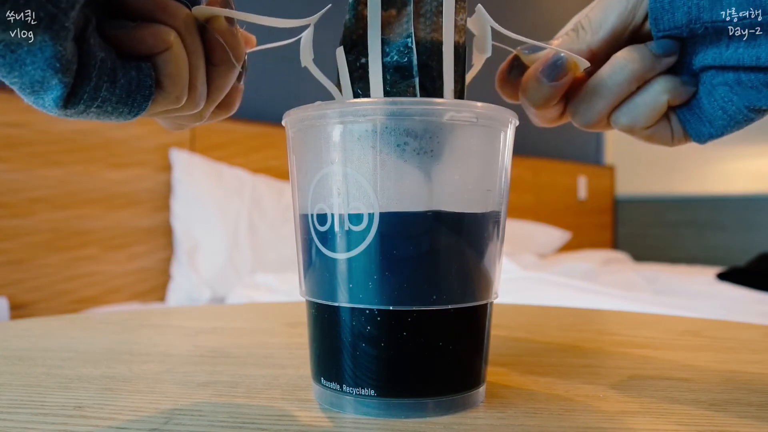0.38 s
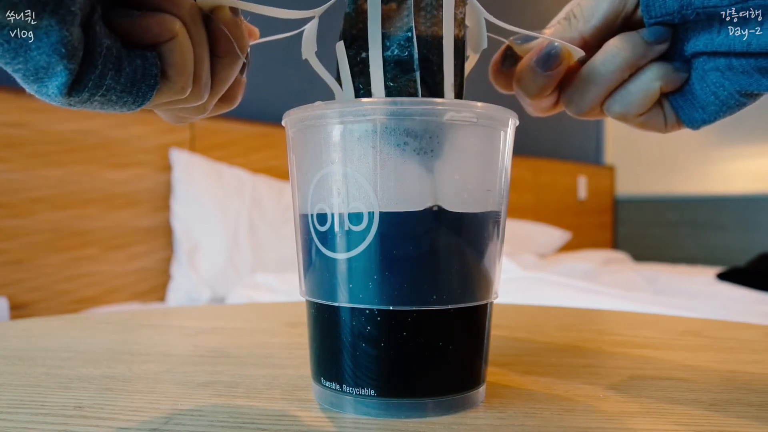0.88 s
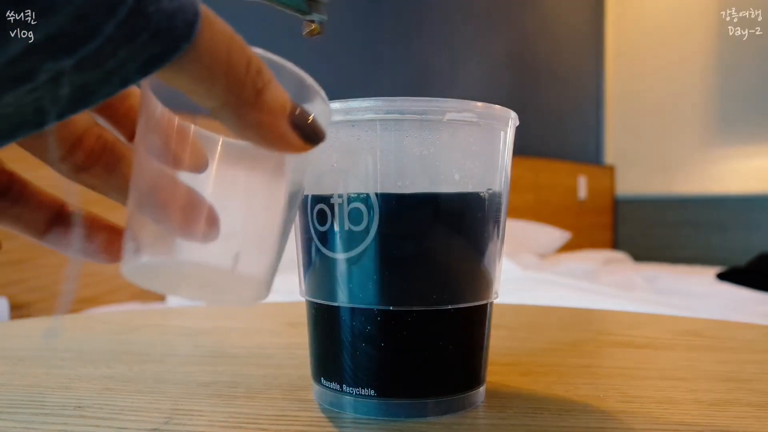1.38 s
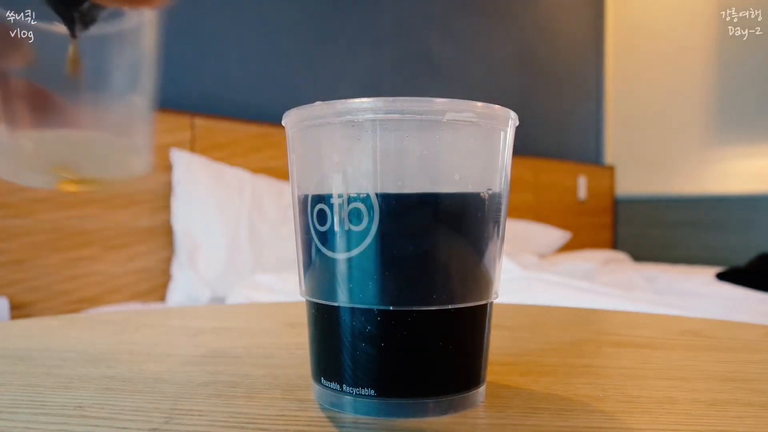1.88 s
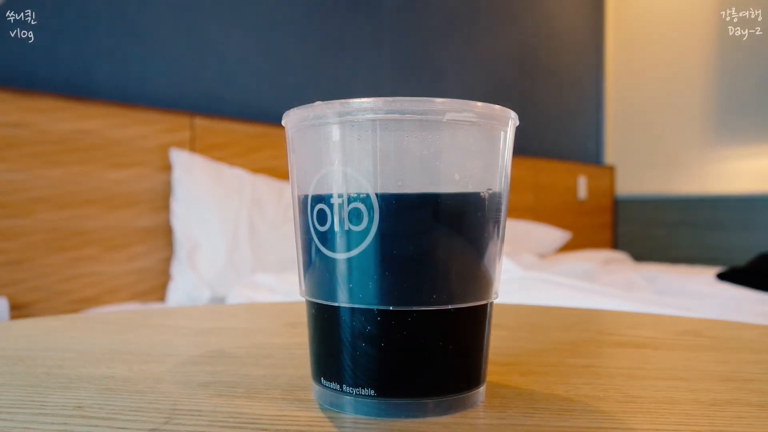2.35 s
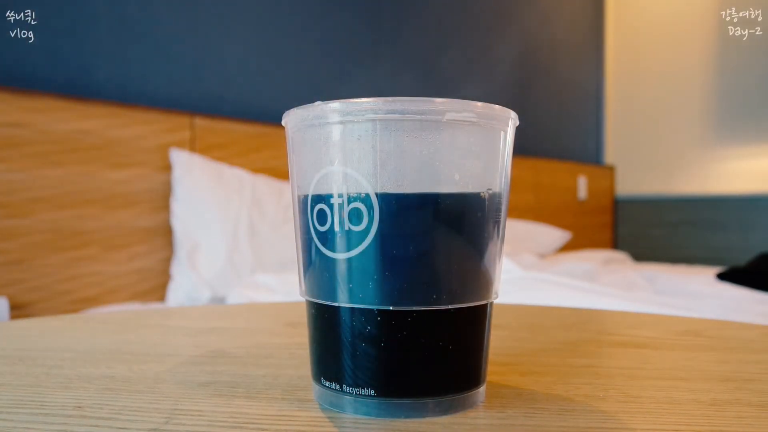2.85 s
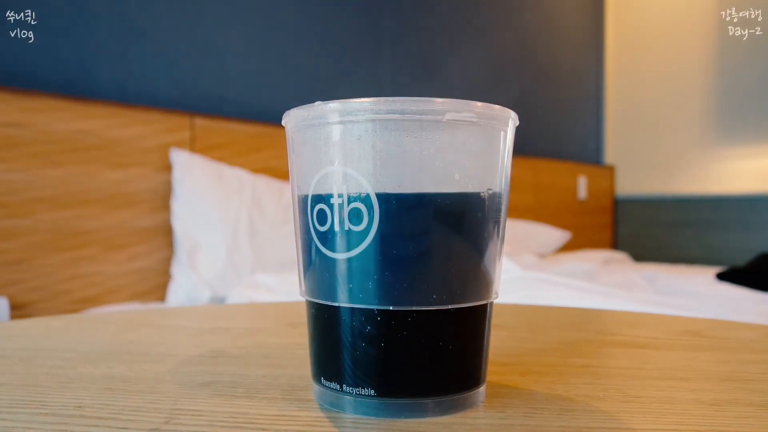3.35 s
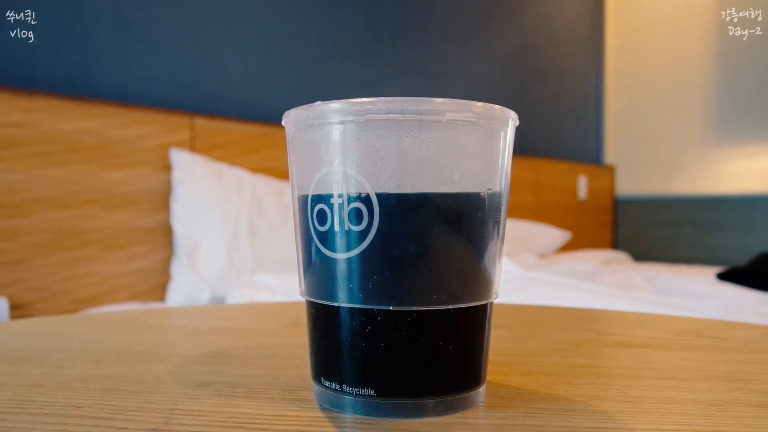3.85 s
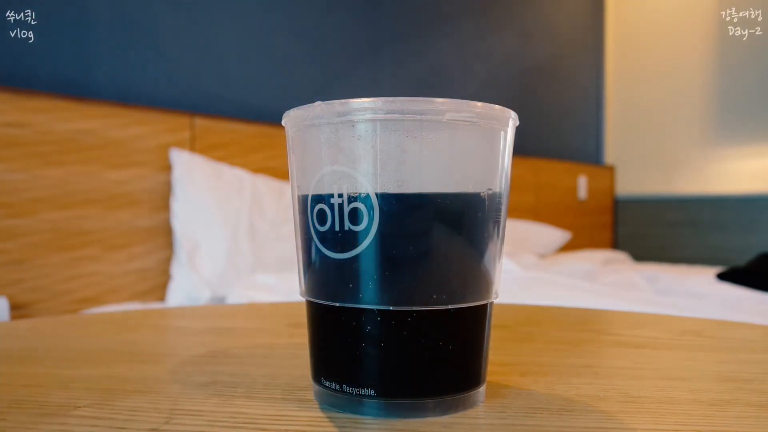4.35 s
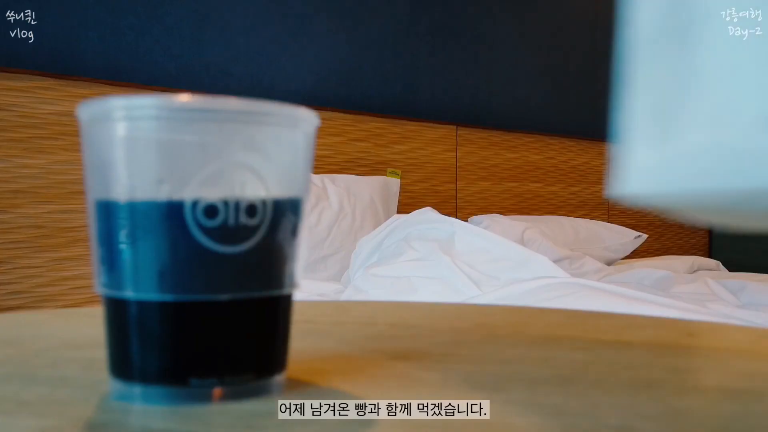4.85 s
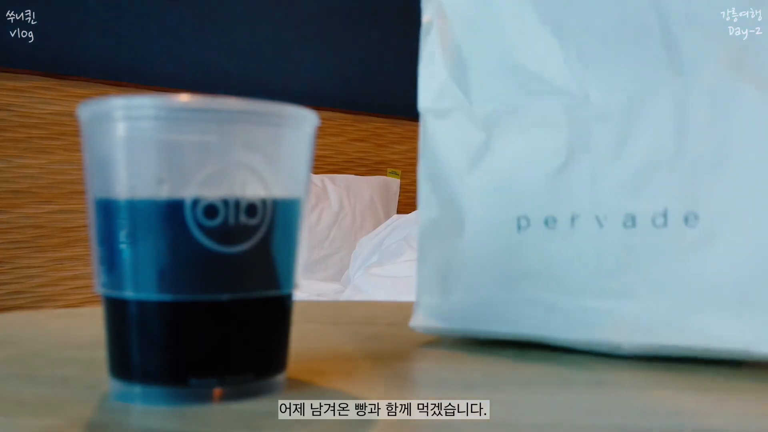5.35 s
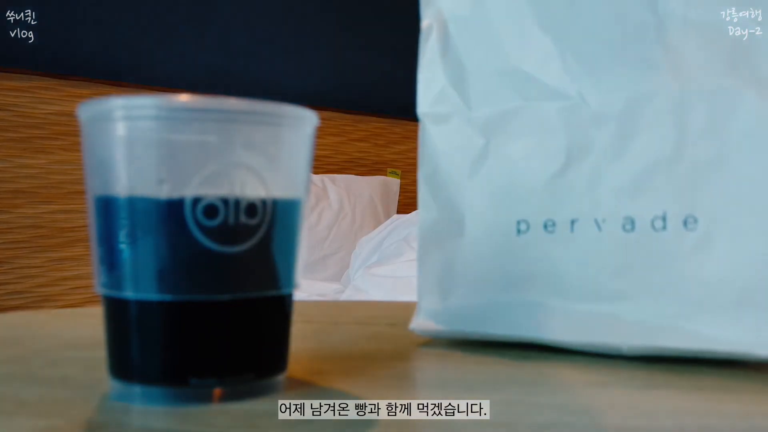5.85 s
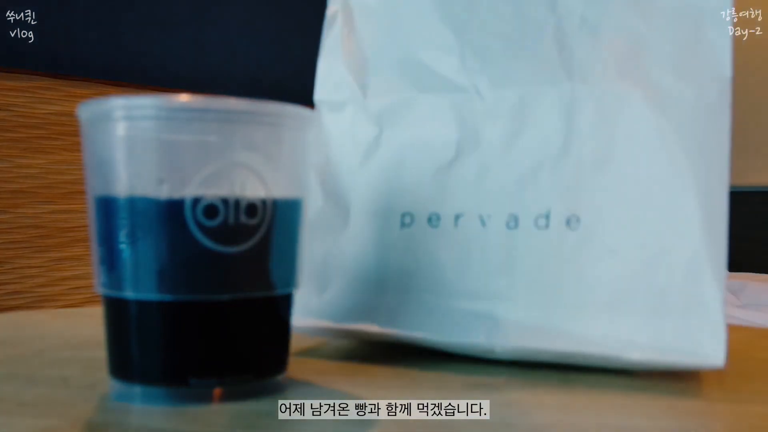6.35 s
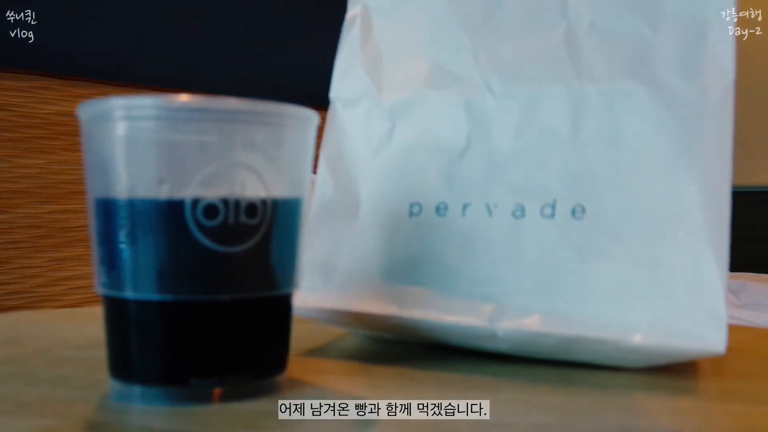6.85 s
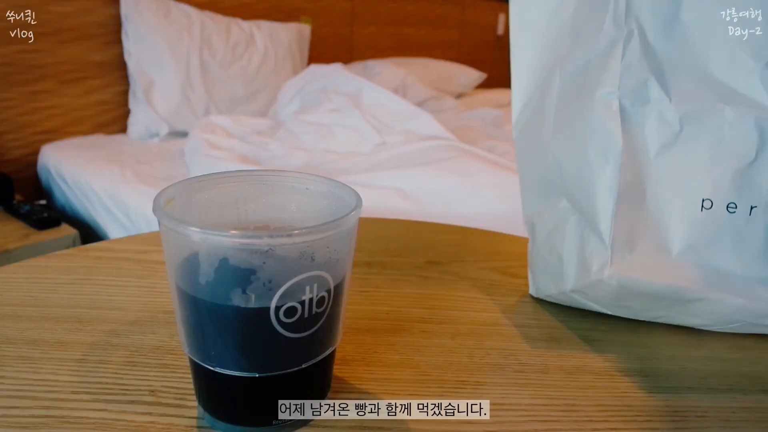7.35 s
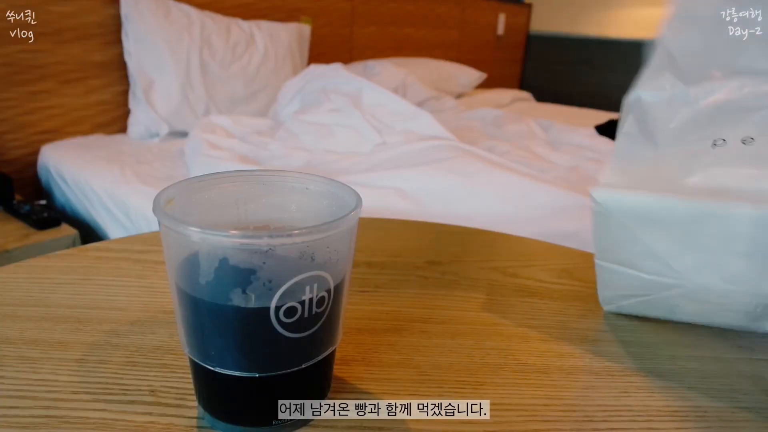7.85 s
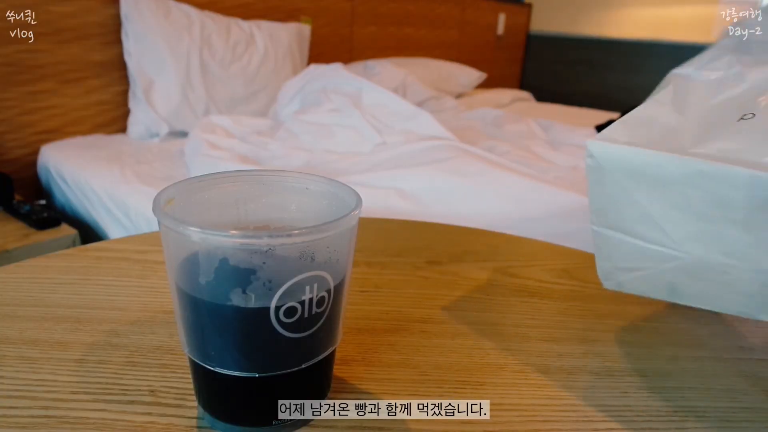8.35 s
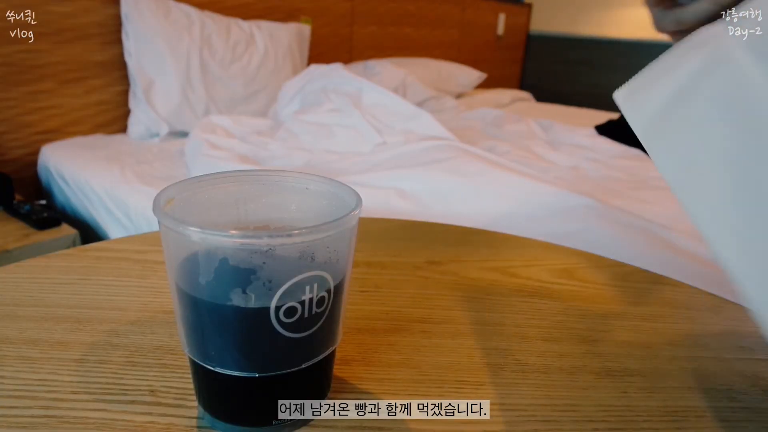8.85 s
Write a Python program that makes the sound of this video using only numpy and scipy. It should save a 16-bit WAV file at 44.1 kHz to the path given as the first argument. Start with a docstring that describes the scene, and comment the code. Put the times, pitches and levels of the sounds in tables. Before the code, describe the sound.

Close to a wooden table in a quiet bedroom, low airy hum and soft rumble. A tiny drip, sleeves brushing, a light cup knock and faint high ring come first. Around five seconds a paper bag touches down with a few dry crinkles, is shifted, then from seven seconds hands work it into loud, dense crackling with sharp snaps.

```python
"""A quiet bedroom heard close to a wooden table, over humming air and a lumpy rumble, with three brief fades.
A faint whine (a flickering sine) and a last drop (one ringing click) open it; sleeves brush as shaped noise.
A small cup knocks the table's ringing modes, and something hard gives one thin high ring.
Then a paper bag is set down, shifted and pulled open: creases snap as noise bursts and the walls buckle in
short notes. Clumped grains crackle densely as the hands work it, and two stiff creases pop very close."""
import sys
import numpy as np
from scipy import signal
from scipy.fft import rfft, irfft
from scipy.io import wavfile

SR = 44100
rng = np.random.default_rng(int(sys.argv[2]) if len(sys.argv) > 2 else 0)


def level_to_linear(level):
    """Convert decibel levels to linear amplitude factors, elementwise."""
    exponent = np.asarray(level, float) / 20
    return 10 ** exponent


def transcribe(u):
    """Save the signal u as a 16-bit wav file named by the first command-line argument.

    u: samples, shape (n,) or (channels, n), limited to [-1, 1]; the rate is SR.
    q: integer samples, one column per channel.
    """
    v = np.clip(np.atleast_2d(u).T, -1, 1)
    q = np.round(v * 32767).astype(np.int16)
    wavfile.write(sys.argv[1], SR, q)


N = 395136

# Colour of the ventilation noise. Each row: frequency in Hz, relative density in dB per Hz.
AIR_COLOUR = [(41, -36), (70, -12), (168, -10), (197, -4.5), (308, -5.5), (472, -15), (647, -12),
              (1420, -15), (1940, -21), (3480, -24.5), (15000, -40.5)]
# Loudness of the ventilation noise, before its small drift. Each row: time in seconds, level in dB.
AIR_LEVEL = [(0, -64), (1.1, -63), (1.3, -61), (3, -57.5), (4.7, -60.5), (8.96, -58)]
# Loudness of the low rumble. Each row: time in seconds, level in dB.
RUMBLE_LEVEL = [(0.0, -63), (2.37, -68.5), (2.84, -56), (3.34, -66.5), (3.69, -57), (4.49, -60.5),
                (5.5, -60), (5.94, -58), (6.09, -47.5), (6.44, -50.5), (6.89, -66), (7.14, -51),
                (8.14, -57), (8.21, -61), (8.83, -56), (8.96, -40)]
# Swell tables: rise and fall are the times taken by 20 dB.
# The hum swells. Each row: peak in seconds, level in dB, rise in seconds, fall in seconds.
HUM_SWELLS = [(1.36, -57.5, 0.17, 0.49), (2.72, -51.5, 0.67, 0.61), (4.35, -57.5, 0.32, 0.59),
              (5.12, -54, 0.2, 0.15), (6.6, -51.5, 0.94, 0.48), (8.8, -42, 0.16, 0.52)]
# The hum's octave swells once. Each row: peak in seconds, level in dB, rise in seconds, fall in seconds.
OCTAVE_SWELLS = [(1.46, -57, 0.36, 0.52)]
# The table sways under the bag. Each row: peak in seconds, level in dB, rise in seconds, fall in seconds.
SWAY_SWELLS = [(5.58, -50, 0.12, 0.35)]
# Strokes of sleeves and hands. Each row: peak in seconds, level in dB before the brushing trim,
# rise in seconds, fall in seconds, treble in dB relative to that level.
STROKES = [(.33, -58.5, 0.092, 0.16, -10), (1.546, -49, 0.0081, 0.13, 1), (1.595, -52.5, 0.27, 0.21, -17),
           (2.06, -71, 0.084, 0.12, 12), (2.39, -57.5, 0.16, 0.36, -5), (2.63, -47.5, 0.091, 0.16, -2),
           (2.789, -40, 0.076, 0.22, 3), (2.808, -30, 0.0089, 0.097, 0), (3.1, -50.5, 0.49, 0.17, -3),
           (3.275, -47, 0.06, 0.13, -3.5), (3.705, -54, 0.012, 0.22, 1), (3.83, -45.5, 0.21, 0.25, -3),
           (4.1, -51, 0.27, 0.39, -8), (4.381, -40.5, 0.015, 0.14, -7), (4.46, -48, 0.19, 0.093, -3),
           (4.59, -45.5, 0.033, 0.22, -7), (4.776, -38.5, 0.021, 0.085, -10)]
# Blows on the table. Each row: time in seconds, strength in dB, hardness in dB per octave.
KNOCKS = [(1.543, -35, 2.5), (1.5468, -32.5, -1), (1.594, -35.5, 2.5), (3.2, -39, 10), (3.701, -33.5, 6),
          (4.372, -28.5, 17), (4.769, -22.5, 21), (4.779, -26, 23)]
# Modes of the table top. Each row: frequency in Hz, relative level in dB, time to die by 60 dB in seconds.
TABLE_MODES = [(223, -7, 0.18), (317, -5.5, 0.17), (810, 4, 0.0089), (1380, 0, 0.0077), (1475, -3.5, 0.016),
               (2140, -9, 0.0032)]
# A wall of the bag buckles with a hollow note. Each row: start in seconds, peak in dB, pitch in Hz.
FOLDS = [(5.407, -30.5, 835), (5.428, -33, 920), (5.468, -32.5, 520), (6.3145, -25, 855),
         (6.328, -26.5, 516), (6.355, -30, 493), (6.364, -30, 790), (7.067, -24.5, 543),
         (7.092, -23.5, 388), (7.313, -25.5, 385), (7.446, -27, 449), (7.47, -22.5, 553),
         (7.58, -19.5, 553), (7.61, -19.5, 780), (7.731, -22, 580), (7.87, -27.5, 570)]
# The hands squeeze or pull the paper. Each row: peak in seconds, level in dB before the crackle trim,
# rise in seconds, fall in seconds, treble in dB relative to that level.
PULLS = [(4.71, -55, 0.075, 0.4, -8), (5.2, -53.5, 0.14, 0.078, -32), (5.41, -33, 0.043, 0.12, -7),
         (5.55, -52, 0.32, 0.67, -5), (6.001, -44, 0.28, 0.99, -2), (6.343, -34.5, 0.037, 0.066, 5.5),
         (6.58, -50.5, 0.32, 0.33, -5), (6.9, -41, 0.025, 0.035, -19), (7.012, -24.5, 0.028, 1, 4),
         (7.084, -11.5, 0.024, 0.041, 6), (7.22, -35, 0.14, 0.34, 7.5), (7.36, -21, 0.22, 0.16, -1.5),
         (7.47, -22, 0.084, 0.19, 1.5), (7.599, -21, 0.13, 0.4, 1), (7.73, -23, 0.15, 0.051, 3.5),
         (7.9, -25, 0.16, 0.46, 1.5), (7.98, -30, 0.48, 0.21, -15), (8.067, -22, 0.022, 0.062, -9),
         (8.12, -40, 0.13, 0.064, 9), (8.299, -36.5, 0.047, 0.79, 8.5), (8.439, -24, 0.19, 0.021, 0),
         (8.491, -30, 0.12, 0.1, 10.5), (8.559, -25.5, 0.0089, 0.0085, 12), (8.613, -24, 0.053, 0.031, 9),
         (8.669, -36, 0.078, 0.51, 14), (8.74, -22.5, 0.1, 0.1, -20), (8.791, -22.5, 0.27, 0.041, -4),
         (8.923, -25.5, 0.011, 0.075, -18)]
# Creases snapping. Each row: start in seconds, level in dB before the crease and body gains,
# pitch of the crease in Hz, bag body in dB relative to that level.
SNAPS = [(5.0876, -24.5, 3520, -19.5), (5.097, -24, 2680, -15.5), (5.3645, -52, 3000, -8),
         (5.3804, -34.5, 5230, -8), (5.398, -22, 2510, -18.5), (5.4352, -35, 2640, -5.5),
         (5.4623, -27, 3370, -10.5), (5.5129, -23.5, 5900, -15), (5.526, -26, 3330, -18.5),
         (5.7763, -23, 3160, -14), (5.939, -34, 6250, -26), (5.9763, -17, 2650, -17.5),
         (6.0086, -27.5, 3130, -13), (6.0257, -14.5, 7030, -23), (6.0467, -15, 2670, -12.5),
         (6.0504, -12, 2600, -31), (6.314, -27.5, 2900, -6.5), (6.327, -20.5, 4340, -16),
         (6.364, -12.5, 4700, -20.5), (6.377, -29, 2750, -13), (6.63, -28.5, 3400, -12),
         (6.6404, -25, 4700, -20), (6.874, -28.5, 4120, -24.5), (6.906, -31.5, 3020, -5.5),
         (6.926, -13, 4560, -23), (6.975, -19, 3010, -17.5), (7.0273, -6, 4500, -24),
         (7.0759, -4, 5700, -32), (7.0874, -10, 13200, -20), (7.094, -6, 2660, -38),
         (7.1319, -5, 6600, -24.5), (7.178, -20, 3050, -39), (7.1899, -10.5, 7230, -24),
         (7.3162, -13, 3800, -18.5), (7.3402, -6, 6120, -20), (7.3639, -10.5, 2760, -24),
         (7.3767, -14, 3140, -13), (7.4127, -8.5, 5200, -34), (7.439, -4.5, 13100, -29),
         (7.444, -7, 6540, -24), (7.4693, -3, 12300, -27), (7.5194, -9.5, 8330, -17.5),
         (7.5758, -8, 4940, -21), (7.5781, -10, 3020, -16), (7.6059, -15, 3070, -20),
         (7.6138, -4, 10700, -22), (7.622, -6.5, 2700, -25), (7.6899, -22, 6900, -9),
         (7.731, -10.5, 5900, -24), (7.745, -9.5, 12100, -20), (7.8, -23, 5450, -33),
         (7.866, -8, 3200, -22), (7.876, -9.5, 3950, -19.5), (7.884, -5.5, 14000, -28),
         (7.9403, -8.5, 5570, -18), (7.9651, -5.5, 3260, -42), (8.054, -18.5, 2790, -9),
         (8.077, -6.5, 12700, -32), (8.1021, -16, 2900, -37), (8.207, -17.5, 11300, -48),
         (8.2658, -18.5, 2990, -21), (8.338, -16.5, 4700, -24.5), (8.4377, -5.5, 3300, -26.5),
         (8.47, -11, 6300, -41), (8.555, -9, 7400, -37), (8.5625, -7.5, 3990, -45),
         (8.6113, -7.5, 6100, -48), (8.624, -11.5, 13100, -43), (8.6268, -14, 4860, -35),
         (8.7178, -10.5, 4500, -32), (8.7368, -13, 3400, -17), (8.8796, -24.5, 2980, -8),
         (8.9178, -18, 2700, -13.5)]
# Stiff creases popping very close. Each row: time in seconds, strength of the click in dB.
CRACKS = [(8.155, 3), (8.4519, 4.5)]
# Resonances of the hollow bag. Each row: frequency in Hz, width in Hz, gain in dB around which it wanders.
BAG_RESONANCES = [(357, 250, -2.5), (566, 66, -7.5), (796, 410, -2)]
# Centres between which colour is blended, in Hz: the part left out, body, middle, treble.
SHADES_HZ = [45, 700, 3500, 11000]
# Echoes off the table top and nearest wall, before dulling. Each row: delay in seconds, level in dB.
ECHOES = [(.005, -16.5), (.011, -18)]
# Room tail by band. Each row: centre in Hz, time to die by 60 dB in seconds, relative level in dB.
ROOM_BANDS = [(150, 0.41, 11.5), (540, 0.5, -2), (2190, 0.37, 3), (5750, 0.38, -3), (14700, 0.26, 0.5)]
# Brief fades. Each row: sound stops in seconds, fade-out in seconds, sound returns in seconds,
# fade-in in seconds.
FADES = [(1.171, .1, 1.19, .15), (4.607, .1, 4.622, .13), (6.929, .1, 6.945, .13)]


def rms_one(x):
    """Scales x to an rms of one."""
    return x / np.sqrt(np.mean(x ** 2) + 1e-20)


def level_line(rows):
    """Draws straight lines in dB between the timed levels."""
    s, db = np.transpose(rows)
    return np.interp(np.arange(N) / SR, s, db)


def band(x, low_hz, high_hz):
    """Keeps the sound between two frequencies."""
    sos = signal.butter(2, [low_hz, min(high_hz, .45 * SR)], "band", fs=SR, output="sos")
    return signal.sosfilt(sos, x)


def drift(corner_hz):
    """Slow random wander of rms near one: noise through two smoothing poles, drawn every 40 samples."""
    r = np.exp(-80 * np.pi * corner_hz / SR)
    noise = rng.standard_normal(N // 40 + 2002)
    slow = signal.lfilter([1], [1, -2 * r, r * r], noise)[2000:]   # skip the filter's start
    return np.interp(np.arange(N) / 40, np.arange(len(slow)), rms_one(slow))


def resonance(x, hz, width_hz):
    """Two-pole resonance with a peak gain near one."""
    r = np.exp(-np.pi * width_hz / SR)
    poles = [1, -2 * r * np.cos(2 * np.pi * hz / SR), r * r]
    return signal.lfilter([(1 - r * r) / 2, 0, (r * r - 1) / 2], poles, x)


def ring(clicks, hz, t60):
    """A unit click sets a dying sine of starting height one ringing."""
    r, w = level_to_linear(-60 / (t60 * SR)), 2 * np.pi * hz / SR
    return signal.lfilter([0, np.sin(w)], [1, -2 * r * np.cos(w), r * r], clicks + 1e-18)


def click_at(s, db):
    """One single-sample click."""
    return level_to_linear(db) * (np.arange(N) == round(s * SR))


def swells(rows, colour_db=0):
    """Gain of overlapping swells, linear in dB and added by power; colour_db shifts each one's level."""
    t, power = np.arange(N) / SR, np.zeros(N)
    for (peak_s, db, rise_s, fall_s, *_), shift_db in zip(rows, np.broadcast_to(colour_db, len(rows))):
        rising, falling = (peak_s - t) / max(rise_s, .005), (t - peak_s) / max(fall_s, .005)
        away = np.where(t < peak_s, rising, falling)
        near = away < 4   # silent beyond 80 dB down
        power[near] += level_to_linear(2 * (db + shift_db - 20 * away[near]))
    return np.sqrt(power)


def shades(x, centres_hz):
    """Splits x into overlapping bands, peaked at the centres, that add up to x."""
    log_hz = np.log(np.fft.rfftfreq(x.shape[-1], 1 / SR) + 1)
    spectrum = rfft(x)
    weights = [np.interp(log_hz, np.log(centres_hz), one) for one in np.eye(len(centres_hz))]
    return [irfft(spectrum * weight, x.shape[-1]) for weight in weights]


def coloured(x, rows, body_db):
    """Body, middle and treble of x follow the swells, each swell with its own brightness."""
    _, body, middle, treble = [rms_one(part) for part in shades(x, SHADES_HZ)]
    treble_db = np.array(rows)[:, 4]
    return swells(rows, body_db) * body + swells(rows) * middle + swells(rows, treble_db) * treble


def ventilation():
    """Air noise shaped in frequency, its level drifting slightly."""
    hz = np.fft.rfftfreq(N, 1 / SR)
    points_hz, points_db = np.transpose(AIR_COLOUR)
    colour_db = np.interp(np.log(hz + 1), np.log(points_hz), points_db)
    air = rms_one(irfft(rfft(rng.standard_normal(N)) * level_to_linear(colour_db), N))
    return level_to_linear(level_line(AIR_LEVEL) + 1.2 * drift(12.4)) * air


def rumble():
    """Noise through two low resonances, one narrow and one wide, rising and sinking in lumps."""
    rumble_hz = 40
    narrow = resonance(rng.standard_normal(N), rumble_hz, 10)
    return level_to_linear(level_line(RUMBLE_LEVEL)) * rms_one(resonance(narrow, rumble_hz, 45))


def hum():
    """A sine of wavering pitch and its octave, each with its own swells."""
    hum_hz, waver_hz = 208.5, 1.2
    phase = 2 * np.pi * np.cumsum(hum_hz + waver_hz * drift(3)) / SR
    return swells(HUM_SWELLS) * np.sin(phase) + swells(OCTAVE_SWELLS) * np.sin(2 * phase)


def table_sway():
    """The table sways once under the bag: a very low sine swells and sinks."""
    sway_hz = 17
    return swells(SWAY_SWELLS) * np.sin(2 * np.pi * sway_hz * np.arange(N) / SR)


def whine():
    """A faint, thin sine whose level flickers, until it stops."""
    t = np.arange(N) / SR
    whine_hz, level_db, flicker_db, ends_s = 3402, -82.5, 5, 1.17
    return level_to_linear(level_db + flicker_db * drift(9.9)) * (t < ends_s) * np.sin(2 * np.pi * whine_hz * t)


def drip():
    """A last drop falls into the cup: one click rings a very short note."""
    return ring(click_at(.268, -55), 3850, .01)


def brushing():
    """Cloth on cloth: smooth friction noise with a broad resonance, slightly uneven."""
    trim_db, uneven_db, body_db = -9, 0.94, 1
    noise = rng.standard_normal(N)
    cloth = noise + level_to_linear(0.45) * resonance(noise, 2720, 2700)
    return level_to_linear(trim_db + uneven_db * drift(23)) * coloured(cloth, STROKES, body_db)


def knocks():
    """Blows set the table's modes ringing, harder ones favouring the upper modes."""
    out, (s, strength_db, hardness_db) = np.zeros(N), np.transpose(KNOCKS)
    for k, (hz, level_db, t60) in enumerate(TABLE_MODES):
        clicks = np.zeros(N)
        tilt_db = hardness_db * np.log2(hz / 1400)
        uneven_db = rng.normal(0, 0.27, len(s))
        clicks[np.round(s * SR).astype(int)] = level_to_linear(strength_db + level_db + tilt_db + uneven_db)
        out += (-1) ** k * ring(clicks, hz, t60)
    # the contact lasts a moment, which rounds the attack
    return signal.lfilter(np.hanning(14) / 6.5, 1, out)


def ping():
    """One thin high ring of something hard: a click sets a single sine dying away."""
    return ring(click_at(4.105, -66), 8090, .45)


def bag_body(x):
    """The hollow bag changes shape, so the resonances it adds to x come and go."""
    wander_db, wander_hz = 3.5, 14
    out = x
    for hz, width_hz, db in BAG_RESONANCES:
        out = out + level_to_linear(db + wander_db * drift(wander_hz)) * resonance(x, hz, width_hz)
    return out


def folds():
    """Each buckling wall is a short note that swells at once and dies within a few cycles."""
    rise_s, cycles = 0.0007, 16   # cycles taken to die by 60 dB
    out, t = np.zeros(N + 4096), np.arange(4096) / SR
    for (s, peak_db, hz), start in zip(FOLDS, rng.random(len(FOLDS))):
        shape = (1 - np.exp(-t / rise_s)) * level_to_linear(-60 * t * hz / cycles)
        i = round(s * SR)
        out[i:i + len(t)] += level_to_linear(peak_db) * shape / shape.max() * np.sin(2 * np.pi * (hz * t + start))
    return out[:N]


def crackle():
    """Tiny creases come in clumps over friction noise; each rings a short patch of paper."""
    clumps = drift(40)
    born = rng.random(N) < 2000 * level_to_linear(3 * clumps) / SR   # chance of a crease in each sample
    sizes = born * level_to_linear(4 * np.minimum(rng.exponential(1, N), 2.9)) * rng.choice([-1, 1], N)
    patches_hz, dealt = np.geomspace(400, 15000, 20), rng.integers(0, 20, N)
    grains = np.zeros(N)
    for k, hz in enumerate(patches_hz):
        grains += ring(sizes * (dealt == k), hz, 0.00014 + 3.86 / hz) * np.sqrt(hz)
    friction = .45 * level_to_linear(2 * clumps) * rng.standard_normal(N)
    sheet = bag_body(rms_one(grains) + friction)
    # gentle handling is heard more through the bag's body
    body_db = -1.5 - 0.38 * (np.array(PULLS)[:, 1] + 30)
    return level_to_linear(-9) * coloured(sheet, PULLS, body_db)


def evened(bursts):
    """Flattens the spectrum of each burst and keeps its energy: paper is dry, it has no pitch."""
    spectrum, length = rfft(bursts), bursts.shape[-1]
    fade = np.hanning(2 * length)[length:] ** 8
    flat = irfft(spectrum / np.abs(spectrum) ** .8, length) * fade
    energy, flat_energy = [np.sum(x ** 2, axis=-1, keepdims=True) for x in (bursts, flat)]
    return flat * np.sqrt(energy / flat_energy)


def snaps():
    """Dying noise bursts ring crease and bag; returns the close sound and the evener one sent to the room."""
    # decays by 60 dB before evening: the bag, and a 3 kHz crease that shortens with pitch to this power
    body_s, snap_s, shortening = 0.0325, 0.0174, 0.47
    crease_gain_db, body_gain_db = -3, 14.5
    sheet_db, crease_width = -9, 0.16   # broad snap under the ring; ring's width as a share of its pitch
    patch_db, patch_width, patch_octaves = 2.5, 0.033, 1.09   # level, width as a share of pitch, spread
    thump_db = 2   # the bag's weight moves the table
    rise_s = np.array([[.0012], [.0002]])   # bag body, crease
    body, creases, even = np.zeros((3, N + 4096))
    t = np.arange(4096) / SR
    bursts = rng.choice([-1., 1.], (len(SNAPS), 2, 4096))
    # each crease also rings four small patches of paper
    patches = patch_octaves * rng.standard_normal((len(SNAPS), 4))
    for (s, level_db, hz, body_db), burst, octaves in zip(SNAPS, bursts, patches):
        decay_s = np.array([[body_s], [snap_s * (3000 / hz) ** shortening]])
        thud, snap = evened((1 - np.exp(-t / rise_s)) * level_to_linear(-60 * t / decay_s) * burst)
        snap = band(snap, 2060, 15000)
        crease = level_to_linear(sheet_db) * snap + resonance(snap, hz, crease_width * hz)
        for patch_hz in np.clip(hz * 2 ** octaves, 2000, 15000):
            crease = crease + level_to_linear(patch_db) * resonance(snap, patch_hz, patch_width * patch_hz)
        here = slice(round(s * SR), round(s * SR) + len(t))
        crease_gain = level_to_linear(level_db + crease_gain_db) / np.abs(crease).max()
        body[here] += level_to_linear(level_db + body_db + body_gain_db) * thud
        creases[here] += crease_gain * crease
        even[here] += crease_gain * snap * crease.std() / snap.std()
    body, creases, even = [part[:N] + 1e-18 for part in (body, creases, even)]
    body = band(bag_body(body), 210, 3900) + level_to_linear(thump_db) * band(body, 65, 120)
    return body + creases, body + even


def cracks():
    """Very short and bright clicks ring three modes, so close that no room is added."""
    clicks = sum(click_at(s, db) for s, db in CRACKS)
    high, middle, low = ring(clicks, 12750, 0.0013), ring(clicks, 10500, 0.0021), ring(clicks, 3700, 0.014)
    return high + level_to_linear(-10) * middle + level_to_linear(-29) * low


def room(x, wet_db):
    """Two dull early echoes, then a noise tail that dies band by band."""
    t = np.arange(int(.8 * SR)) / SR
    hz, t60, level_db = np.transpose(ROOM_BANDS)
    bands = shades(rng.standard_normal(len(t)), hz)
    tail = sum(part * level_to_linear(db - 60 * t / s) for part, s, db in zip(bands, t60, level_db))
    tail = tail * (1 - np.exp(-t / 0.00057))
    tail = level_to_linear(wet_db) * tail / np.sqrt(np.sum(tail ** 2))
    early = np.zeros(len(t))
    for s, db in ECHOES:
        early[round(s * SR)] = level_to_linear(db)
    return signal.fftconvolve(x, tail + band(early, 53, 2800))[:N]


def scene():
    """Lays the bag, the blows and their room over the brushing and the room tone."""
    background = ventilation() + rumble() + hum() + table_sway() + whine() + drip()
    close, spread = snaps()
    rustle = folds() + crackle()
    blows = knocks() + ping()
    reverb = room(spread + rustle, wet_db=-6.5) + room(blows, wet_db=-15)
    return (background + brushing() + blows + rustle + close + cracks() + reverb)[None]


def roll_off(x):
    """The treble ends steeply here."""
    return signal.sosfilt(signal.butter(12, 16330, fs=SR, output="sos"), x)


def record(dry):
    """Brief fades, a trace of hiss, a cut top and a hard ceiling."""
    t, gain = np.arange(N) / SR, np.ones(N)
    for stop, out_s, back, in_s in FADES:
        falling = np.clip((stop + 0.03 - t) / out_s, 0, 1) * (t < stop)
        rising = np.clip((t - back + .015) / in_s, 0, 1) * (t > back)
        gain *= (falling + rising) ** 1.81
    x = dry * gain + level_to_linear(-100) * rng.standard_normal(N)
    x = signal.sosfilt(signal.cheby2(20, 35, 15250, fs=SR, output="sos"), x)
    return roll_off(np.clip(x, -1, 1))


dry = scene()
out = record(dry)
transcribe(out)
```